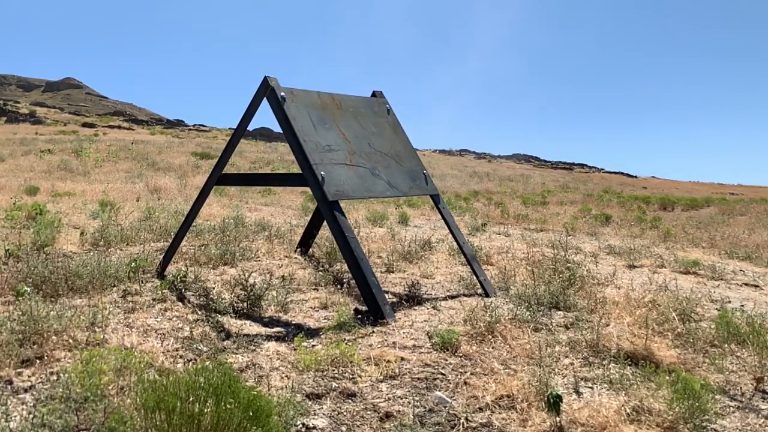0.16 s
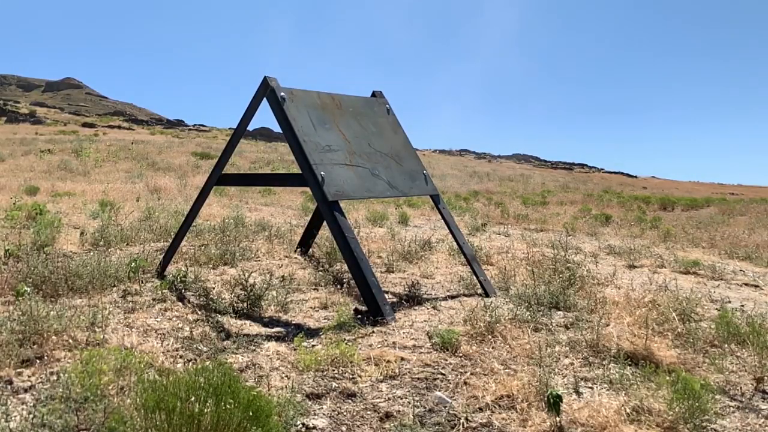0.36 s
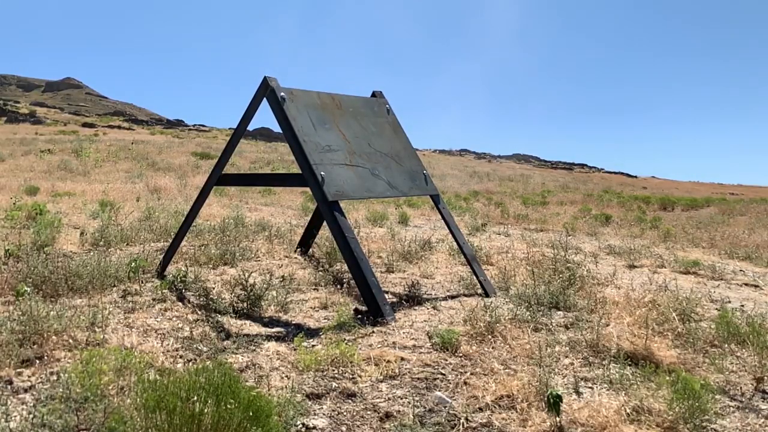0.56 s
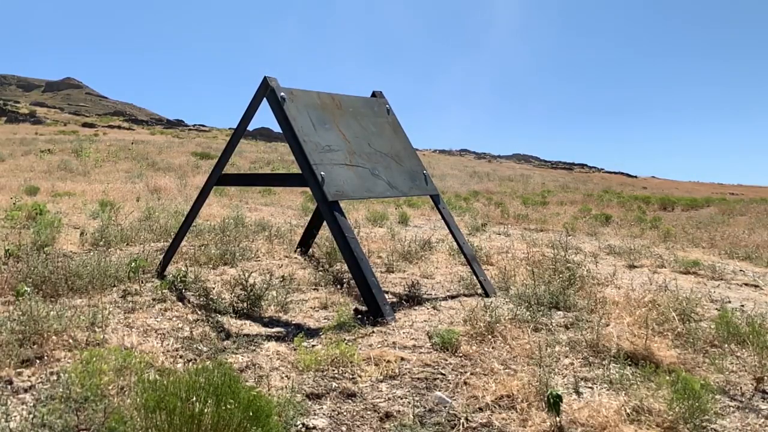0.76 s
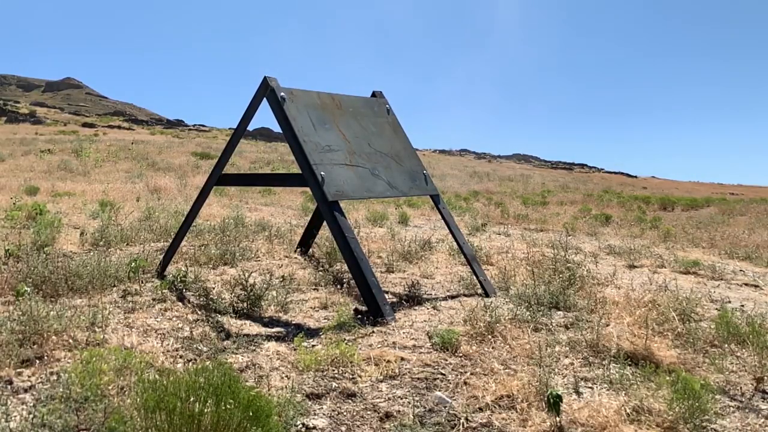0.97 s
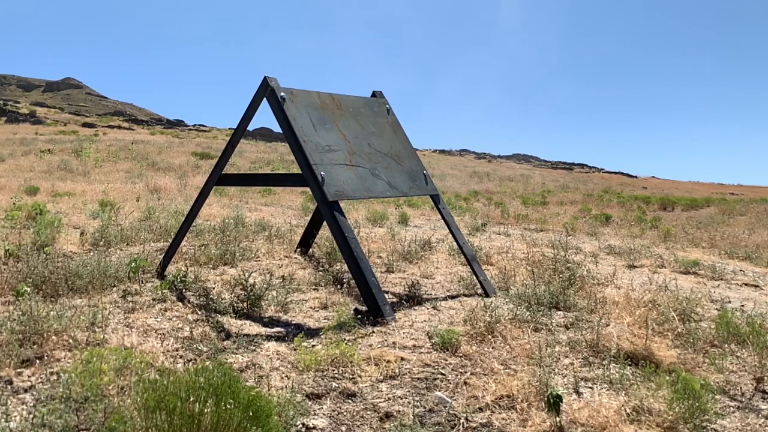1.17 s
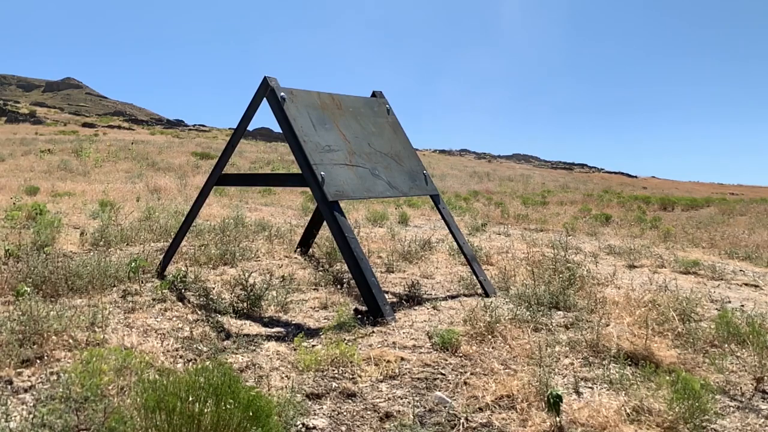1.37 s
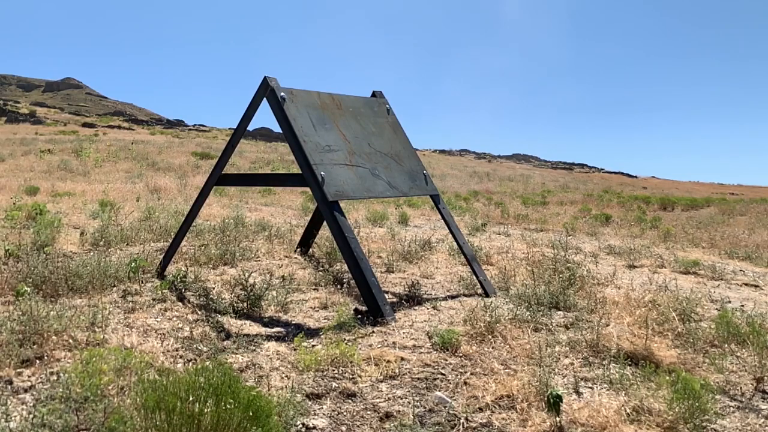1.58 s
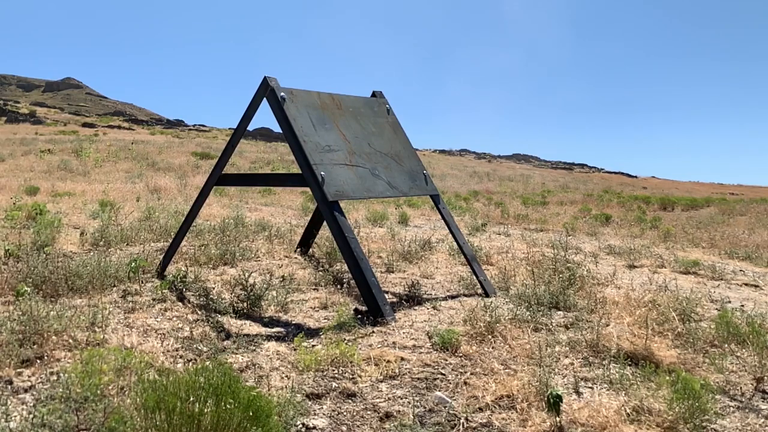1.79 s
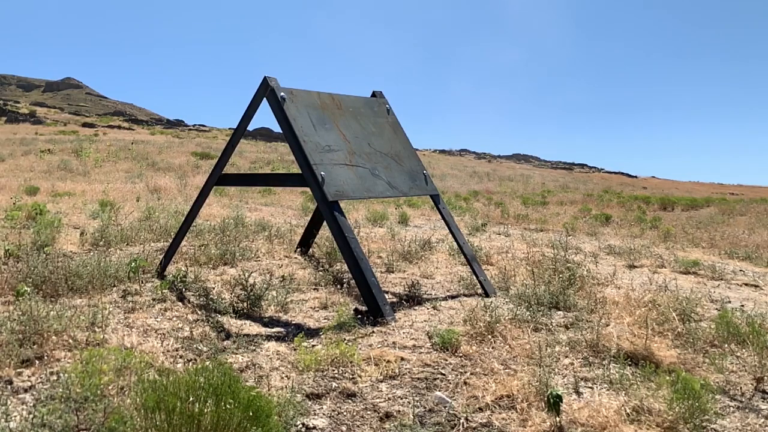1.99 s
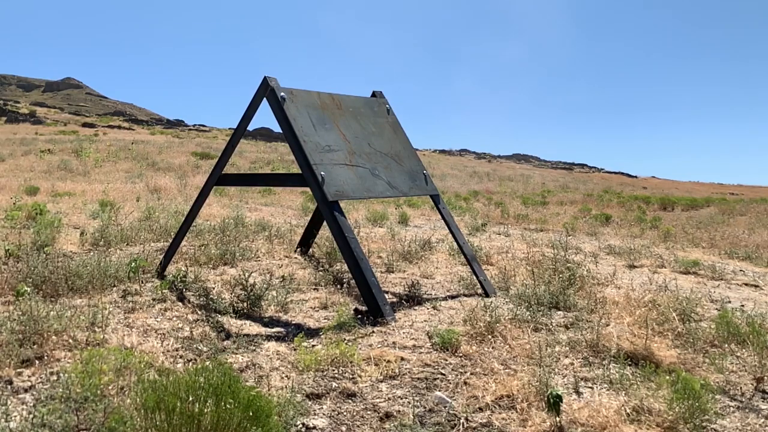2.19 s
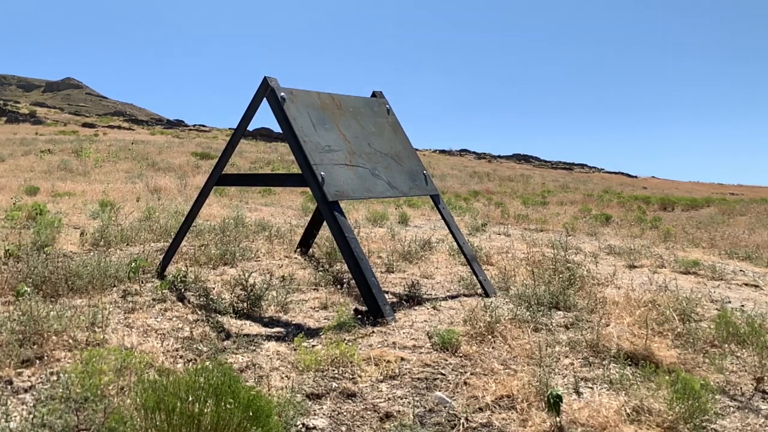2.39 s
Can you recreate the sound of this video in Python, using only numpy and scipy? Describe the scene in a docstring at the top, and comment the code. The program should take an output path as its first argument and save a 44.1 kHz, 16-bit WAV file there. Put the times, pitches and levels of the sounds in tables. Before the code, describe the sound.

Single loud bullet hit on hanging steel, brief wavering ring, then echoes rolling off distant slopes

```python
"""A steel plate on a trestle in open desert rings from a bullet: wavering, beating sines over a dense clang of noise.
A noise crack arrives from the left, then the impact snaps, low sines push the air and small fragments tick.
Bands of noise roll back from the slopes, duller with time, with single echoes standing out.
Low noise buffets the microphone pair; two far thumps of low sine and dull noise come late."""
import sys
import numpy as np
from scipy import signal
from scipy.fft import rfft, irfft
from scipy.io import wavfile
from scipy.ndimage import uniform_filter1d

SR = 44100
rng = np.random.default_rng(int(sys.argv[2]) if len(sys.argv) > 2 else 0)


def boost(x):
    """Linear amplitude factor 10**(x/20) for a level x in decibels (scalar or array-like)."""
    u = np.asarray(x, float) / 20
    return 10 ** u


def unload_wav(signal):
    """Save mono or channel-first audio to the path in sys.argv[1] as 16-bit WAV at rate SR, clipped to [-1, 1]."""
    wavfile.write(
        sys.argv[1],
        SR,
        np.round(np.clip(np.atleast_2d(signal).T, -1, 1) * 32767).astype(np.int16),
    )


N = 108045  # samples


def rms_one(x):
    """Scales a signal to rms 1."""
    return x / np.sqrt(np.mean(x ** 2) + 1e-20)


def clock():
    """Time of every sample (s)."""
    return np.arange(N) / SR


def curve(rows):
    """Straight lines through (start_s, level_db) rows."""
    return np.interp(clock(), *np.transpose(rows))


def at_hz(points, hz):
    """Reads a spectrum table at the given pitches, along log frequency."""
    table_hz, table_db = np.transpose(points)
    return np.interp(np.log(hz), np.log(table_hz), table_db)


def drift(rate_hz):
    """Slow chance, spread 1: noise through two equal low-pass poles, made at every 40th sample."""
    r = np.exp(-80 * np.pi * rate_hz / SR)
    noise = rng.standard_normal(N // 40 + 2002)
    slow = rms_one(signal.lfilter([1], [1, -2 * r, r * r], noise)[2000:])
    return np.interp(np.arange(N) / 40, np.arange(len(slow)), slow)


def dying(start_s, t60_s, rise_s):
    """Envelope that rises at start_s and falls 60 dB in t60_s."""
    t = np.maximum(clock() - start_s, 0)
    return (1 - np.exp(-t / rise_s)) * boost(-60 * t / t60_s)


LINE_WIDTH_HZ = 10


def coloured(spectrum, alike, lines_db=0):
    """Stereo noise of given spectrum and likeness between sides, optionally in random narrow lines; rms 1."""
    mid, side, ripple = rng.standard_normal((3, N))
    alike = np.clip(alike, 0, 1)
    both = np.sqrt(1 + alike) * mid + np.sqrt(1 - alike) * side * [[1], [-1]]
    hz = np.maximum(np.arange(N // 2 + 1) * SR / N, 1)
    size = int(LINE_WIDTH_HZ * N / SR)
    ripple = uniform_filter1d(ripple[:len(hz)], size=size)
    ripple = rms_one(uniform_filter1d(ripple, size=size))
    return rms_one(irfft(rfft(both) * boost(at_hz(spectrum, hz) + lines_db * ripple), N))


# Strongest modes of the plate: pitch_hz
MODE_PITCHES = [275, 635, 784, 1034, 1442, 1531, 1949, 2276, 2558, 2628, 2913, 3010, 3295, 3612, 4340]
# Their shares of the ring, row for row: level_db [relative], t60_s [fall against one another]
MODE_SHARES = [(-32, 9), (-22.5, 2.9), (-15, 2.1), (-17.5, 4), (-14.5, 4.7), (-12, 9), (-1, 0.53),
               (-6, 1.2), (-5.5, 0.57), (2, 0.73), (-7, 1.6), (0, 0.51), (4, 0.49), (-10.5, 0.57),
               (-26, 2.3)]
# Level of the ring, held then dying: start_s, level_db
RING_LEVEL = [(.25, -16.5), (.278, -16.5), (.316, -21.5), (.448, -20.5), (.544, -33), (.7, -50),
              (1.05, -68.5)]
# Countless weak modes, heard as a clang: pitch_hz, level_db [relative, per Hz]
CLANG_SPECTRUM = [(250, -27), (800, -3), (1500, -2.5), (2600, -3.5), (3500, -11.5), (4300, -20),
                  (5500, -50.5)]
# Top modes, too dense to tell apart: pitch_hz, level_db [relative, per Hz]
SHIMMER_SPECTRUM = [(3000, -28.5), (3900, 2), (7000, -13), (8500, -1.5), (9900, -10.5), (10700, -33),
                    (11800, -10), (14200, -10.5), (14800, -53)]
# Level of the treble: start_s, level_db
SHIMMER_LEVEL = [(.25, -16), (.316, -27.5), (.448, -27.5), (.544, -47), (.9, -79)]
RING_START_S, RING_RISE_S, RING_CUT_DB_PER_S = .245, .002, 200  # the cut follows the last ring row
WOBBLE_DB, WOBBLE_HZ = 3.6, 14
TWIN_SHARE, TWIN_DB = .012, -5  # each mode has a weaker twin close by: spread of its detuning, level
CLANG_ALIKE, CLANG_FADE_DB_PER_S = .7, 12  # fade against the ring level
LINE_DEPTH_DB, SHIMMER_ALIKE = 6.5, .26
PLATE_PAN_DB, PHASE_SPREAD_RAD = -.64, .58  # left over right; spread of phase between sides


def plate():
    """Wavering modes beat with their twins, phased apart per side, over the dense clang and treble."""
    t = np.maximum(clock() - RING_START_S, 0)
    modes, power = 0, 0
    chances = rng.standard_normal((len(MODE_SHARES), 3))
    for hz, (db, t60_s), (a, b, c) in zip(MODE_PITCHES, MODE_SHARES, chances):
        height = boost(db - 60 * t / t60_s)
        phase = 2 * np.pi * hz * t + 9 * a + PHASE_SPREAD_RAD * b * np.array([[.5], [-.5]])
        twin = boost(TWIN_DB) * np.sin(phase * (1 + TWIN_SHARE * c) + a / b)
        modes = modes + height * boost(WOBBLE_DB * drift(WOBBLE_HZ)) * (np.sin(phase) + twin)
        power = power + height ** 2 / 2
    clang = boost(-CLANG_FADE_DB_PER_S * t) * coloured(CLANG_SPECTRUM, CLANG_ALIKE, LINE_DEPTH_DB)
    # dividing by the summed power leaves the overall level to the ring curve
    body = boost(curve(RING_LEVEL)) * (modes / np.sqrt(power) + clang)
    top = boost(curve(SHIMMER_LEVEL)) * coloured(SHIMMER_SPECTRUM, SHIMMER_ALIKE, LINE_DEPTH_DB)
    rise = np.minimum(t / RING_RISE_S, 1)
    cut = boost(-RING_CUT_DB_PER_S * np.maximum(clock() - RING_LEVEL[-1][0], 0))
    return rise * cut * (body + top) * boost([[PLATE_PAN_DB / 2], [-PLATE_PAN_DB / 2]])


# Bullet flattens on the steel: start_s, level_db
IMPACTS = [(0.231, -6)]
IMPACT_T60_S, SPLASH_DB, SPLASH_T60_S = .0065, -10.5, .033


def impact():
    """One bright noise bursts sharply at the blow and lingers as a splash of lead."""
    noise = coloured([(300, -20.5), (1500, 9), (9000, -12.5), (16000, -22)], .98)
    snaps = sum(boost(db) * dying(start_s, IMPACT_T60_S, .000066) for start_s, db in IMPACTS)
    splash = boost(SPLASH_DB) * dying(IMPACTS[0][0], SPLASH_T60_S, .00069)
    return (snaps + splash) * noise


# Air pushed by the blow: start_s, pitch_hz, level_db, t60_s
PUSHES = [(0.232, 93.4, -13.5, 0.12), (0.237, 48.54, -11.5, 0.16)]
PUSH_LEAD_RAD = .24  # left ahead and right behind, by this much each


def push():
    """Dying low sines for the air pushed by the blow, leading on the left."""
    t, out = clock(), 0
    lead = np.array([[PUSH_LEAD_RAD], [-PUSH_LEAD_RAD]])
    for start_s, hz, db, t60_s in PUSHES:
        wave = np.sin(2 * np.pi * hz * (t - start_s) + lead)
        out = out + boost(db) * dying(start_s, t60_s, .009) * wave
    return out


# Fragments land: start_s, level_db
FRAGMENTS = [(.6235, -35), (.716, -29)]
FRAGMENT_T60_S = .035


def fragments():
    """Late fragments tick as short bursts in the lower part of the plate's treble."""
    ticks = sum(boost(db) * dying(start_s, FRAGMENT_T60_S, .0016) for start_s, db in FRAGMENTS)
    return ticks * coloured(SHIMMER_SPECTRUM[:6], SHIMMER_ALIKE)


# Colour of the bullet's crack: pitch_hz, level_db [relative, per Hz]
CRACK_SPECTRUM = [(200, -4), (1100, 4), (1800, -14), (2800, 0.5), (7400, -9.5), (8500, -53), (12000, -94)]
CRACK_START_S, CRACK_RISE_S, CRACK_END_S, CRACK_FALL_S = .215, .006, .234, .00047
CRACK_DB, CRACK_PAN_DB = -8, 8
CRACK_RIGHT_CUT_HZ = 2200  # the far microphone is shadowed


def crack():
    """Ragged noise swells and stops short, weaker and duller at the shadowed right microphone."""
    t = clock()
    rise = np.clip((t - CRACK_START_S) / CRACK_RISE_S, 0, 1) ** 2
    fall = np.clip((CRACK_END_S - t) / CRACK_FALL_S, 0, 1)
    noise = coloured(CRACK_SPECTRUM, .9)
    shadowed = signal.lfilter(*signal.butter(1, CRACK_RIGHT_CUT_HZ, fs=SR), noise[1])
    noise[1] = boost(-CRACK_PAN_DB) * rms_one(shadowed)
    return boost(CRACK_DB) * rise * fall * noise


# Shot rolling off the slopes: start_s, level_db [before air loss and single echoes]
ROLL_LEVEL = [(.37, -40), (.42, -30), (.6, -36), (.708, -42), (.876, -48.5), (1.07, -49), (1.13, -57.5),
              (1.56, -66), (1.654, -76.5), (1.87, -70), (1.95, -88.5)]
# Colour of the roll before air loss: pitch_hz, level_db [relative, per Hz]
ROLL_SPECTRUM = [(120, -8), (300, -3), (1200, -5), (3100, -5), (3600, -16), (8000, -40), (12000, -89)]
# Single echoes: start_s, level_db [over the roll, at 2 kHz], t60_s [against the roll], tilt_db_per_octave
ECHOES = [(0.643, -17, 0.7, 31.5), (0.715, -8.5, 0.29, 20), (0.891, -14, 0.53, 26),
          (1.188, 12, 0.053, -1.5), (1.218, 6, 0.056, -1.5), (1.253, 13, 0.41, 1), (1.318, 9.5, 0.9, -0.5),
          (1.344, 16, 0.057, 0), (1.475, 13, 0.13, 4.5), (1.685, 10, 0.75, 2)]
TILT_TOP_HZ = 4600  # the tilt acts up to here
ROLL_PATCHY_DB, ROLL_PATCHY_HZ, ROLL_LINES_DB, ROLL_ALIKE = 2, 34, 4, .5
ECHO_RISE_SHARE = .01  # of the echo's t60
AIR_DB_PER_S, AIR_ZERO_S = 16, .8  # loss at 4 kHz, a gain before the zero time


def roll():
    """Third-octave bands of echo wash; air eats the treble with time, single echoes stand out."""
    t, out = clock(), 0
    noise = [coloured(ROLL_SPECTRUM, ROLL_ALIKE, ROLL_LINES_DB) for _ in range(2)]
    edges = 140 * 2 ** (np.arange(20) / 3)
    shapes = [dying(start_s, t60_s, ECHO_RISE_SHARE * t60_s) for start_s, _, t60_s, _ in ECHOES]
    for k, (low, high) in enumerate(zip(edges, edges[1:])):
        hz = np.sqrt(low * high)
        band_pass = signal.butter(2, [low, high], "band", fs=SR, output="sos")
        band = signal.sosfilt(band_pass, noise[k % 2])  # neighbouring bands use different noise
        octaves = np.log2(min(hz, TILT_TOP_HZ) / 2000)
        echoes = sum(boost(db + tilt * octaves) * shape for shape, (_, db, _, tilt) in zip(shapes, ECHOES))
        loss_db = AIR_DB_PER_S * np.minimum((hz / 4000) ** .92, 5) * (t - AIR_ZERO_S)
        patchy_db = ROLL_PATCHY_DB * drift(ROLL_PATCHY_HZ)
        out = out + band * boost(patchy_db - loss_db) * (1 + echoes)
    fade = (t > ROLL_LEVEL[0][0]) * boost(-60 * np.maximum(t - ROLL_LEVEL[-1][0], 0))
    return boost(curve(ROLL_LEVEL)) * fade * out


# Far blows, the first two rows nearly together: start_s, level_db, pitch_hz, t60_s, tick_db [over level_db]
THUMPS = [(1.758, -29.5, 210, 0.058, -11.5), (1.768, -29.5, 90, 0.073, -29),
          (2.296, -23, 126, 0.033, -49.5)]
THUMP_TICK_HZ, TICK_T60_S = 740, .061
RUMBLE_DB, RUMBLE_T60_S = -17, .98  # dull tail, against its tick


def thumps():
    """Far dull blows: a few low cycles, a soft tick and a dull tail."""
    t, out = clock(), 0
    tick = coloured([(200, -3), (THUMP_TICK_HZ, 0), (1600, -20), (3000, -60)], .81)
    tail = coloured([(60, -4), (200, -5), (700, -16.5), (1600, -19), (3000, -53)], .84)
    for start_s, db, hz, t60_s, tick_db in THUMPS:
        rumble = boost(RUMBLE_DB) * dying(start_s, RUMBLE_T60_S, .0055) * tail
        noise = dying(start_s, TICK_T60_S, .003) * tick + rumble
        cycles = dying(start_s, t60_s, .004) * np.sin(2 * np.pi * hz * (t - start_s))
        out = out + boost(db) * (cycles + boost(tick_db) * noise)
    return out


# Wind on the microphone: start_s, level_db
GUST_LEVEL = [(0, -49), (.19, -39.5), (.35, -53), (.47, -41), (.6, -37), (.8, -63), (1.4, -58.5),
              (1.46, -41.5), (1.51, -58), (1.9, -64), (2.02, -62.5), (2.2, -54.5), (2.27, -43.5),
              (2.4, -42), (2.45, -55.5)]
# Colour of the wind before its two parts are levelled: pitch_hz, level_db [relative, per Hz]
WIND_SPECTRUM = [(12, -23), (28, 1.5), (56, -6.5), (200, -29.5), (400, -46.5), (900, -45.5), (2000, -88)]
WIND_ALIKE, WIND_LUMPY_DB, WIND_LUMPY_HZ = .85, 2, 4.3
WIND_FOLLOWS_HZ, AIR_FLOOR_DB = 219, -54  # above this pitch the wind ignores the gusts


def wind():
    """Lumpy low buffeting under a nearly steady dull breath of air."""
    noise = coloured(WIND_SPECTRUM, WIND_ALIKE)
    low = signal.sosfiltfilt(signal.butter(2, WIND_FOLLOWS_HZ, fs=SR, output="sos"), noise)
    buffeting = boost(curve(GUST_LEVEL) + WIND_LUMPY_DB * drift(WIND_LUMPY_HZ)) * low
    breath = boost(AIR_FLOOR_DB + 2 * drift(2.4)) * (noise - low)
    return buffeting + breath


FAR_LAG_S = .00043


def scene():
    """Near blow and ring, far sounds arriving later at the right microphone, and the wind."""
    far = roll() + thumps()
    far[1] = np.interp(clock() - FAR_LAG_S, clock(), far[1])
    return plate() + impact() + push() + fragments() + crack() + far + wind()


def roll_off(x):
    """The treble ends steeply here."""
    return signal.sosfilt(signal.butter(12, 17130, fs=SR, output="sos"), x)


HISS_DB, CEILING = -92.5, 1.05


def record(dry):
    """Adds the microphones' faint self-noise and bends peaks smoothly under a ceiling."""
    hiss = boost(HISS_DB) * coloured([(8000, .5), (16000, -16)], 0)
    x = (dry + hiss) / CEILING
    mix = CEILING * x / (1 + x ** 4) ** .25
    return roll_off(mix)


dry = scene()
out = record(dry)
unload_wav(out)
```